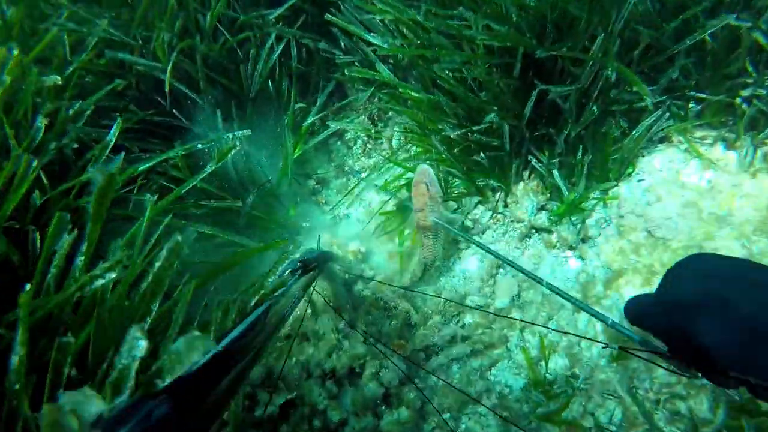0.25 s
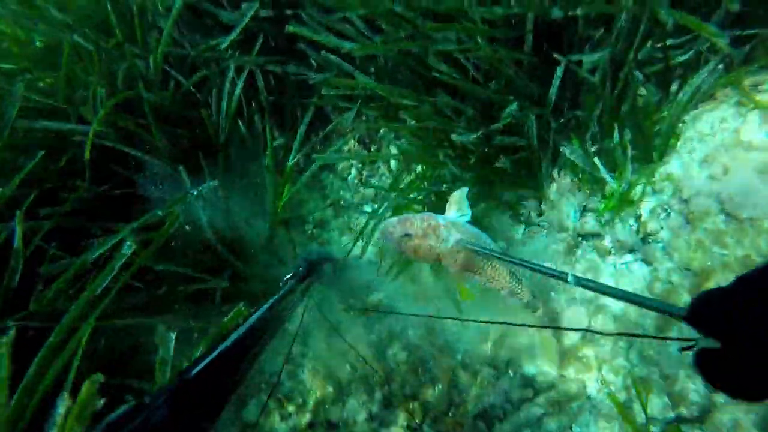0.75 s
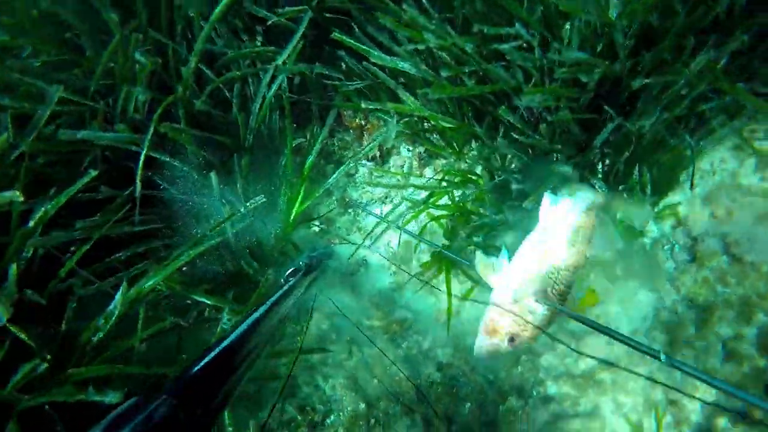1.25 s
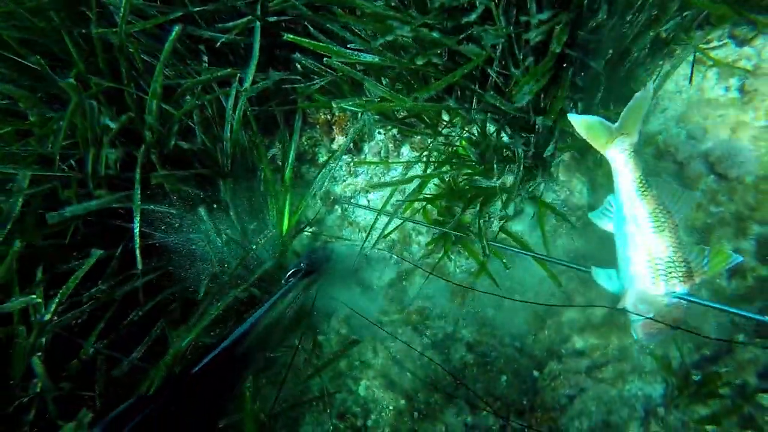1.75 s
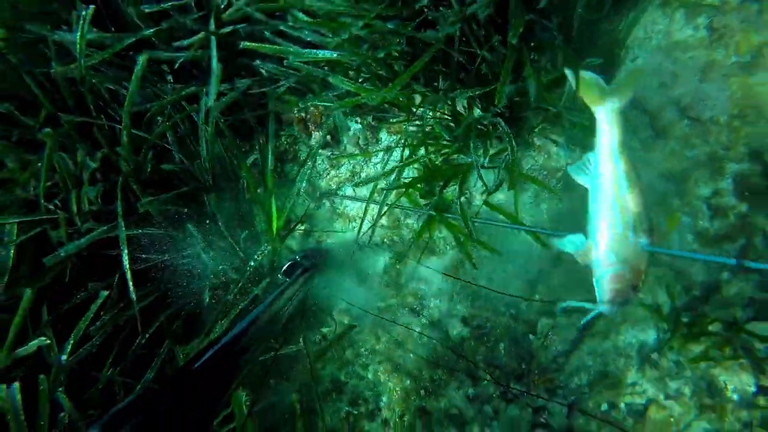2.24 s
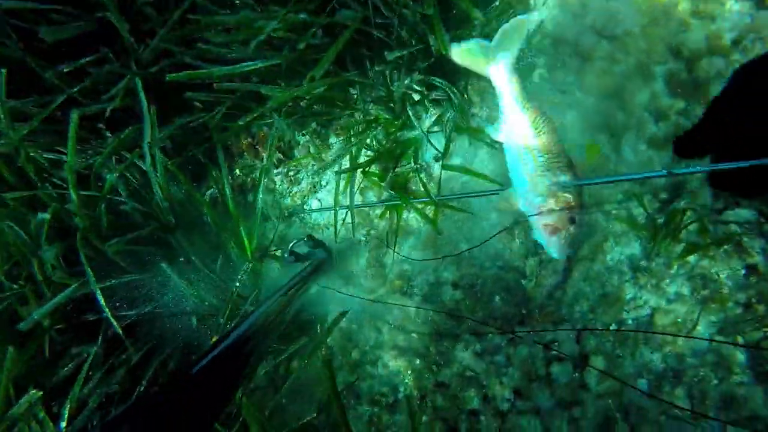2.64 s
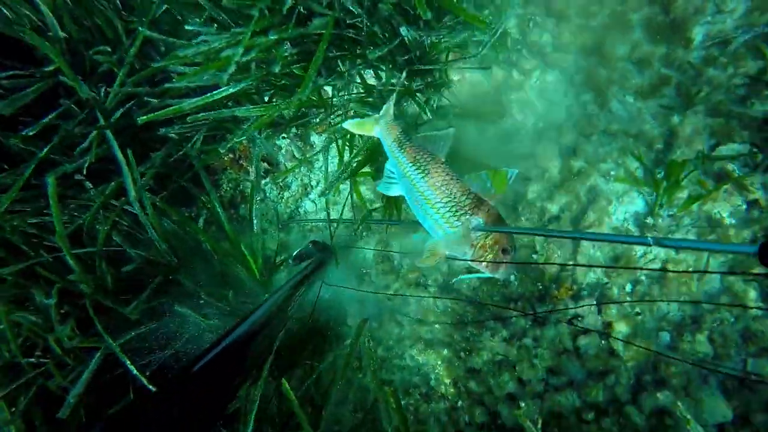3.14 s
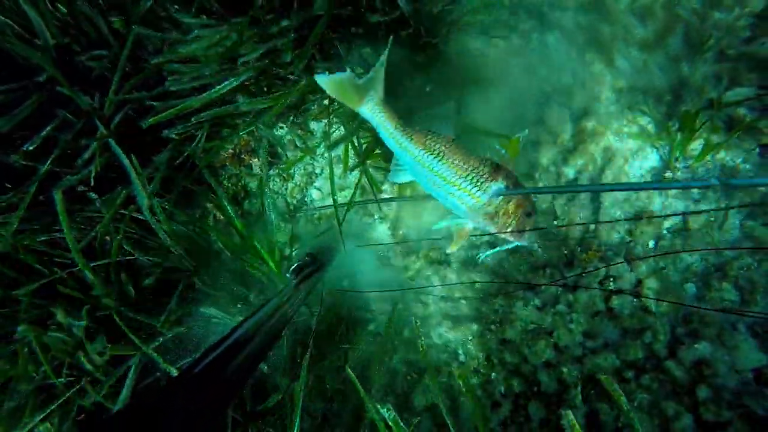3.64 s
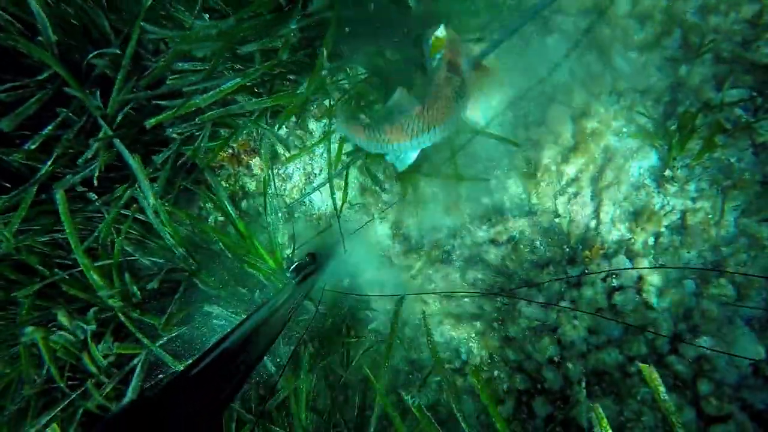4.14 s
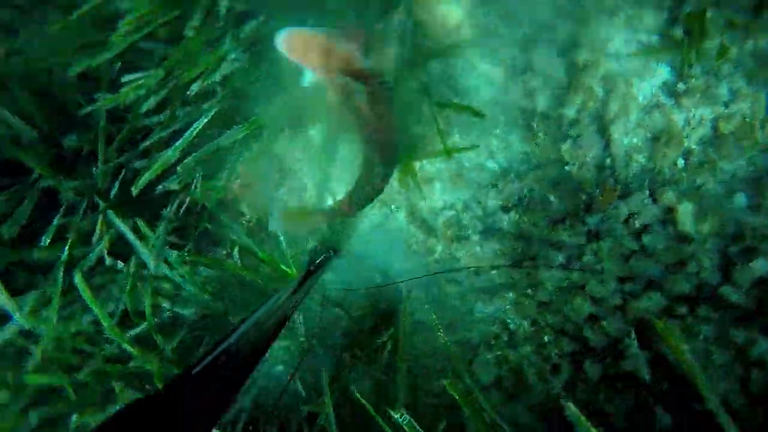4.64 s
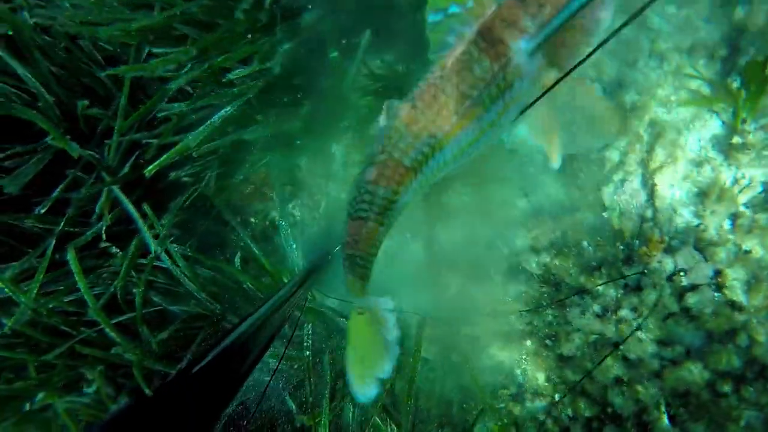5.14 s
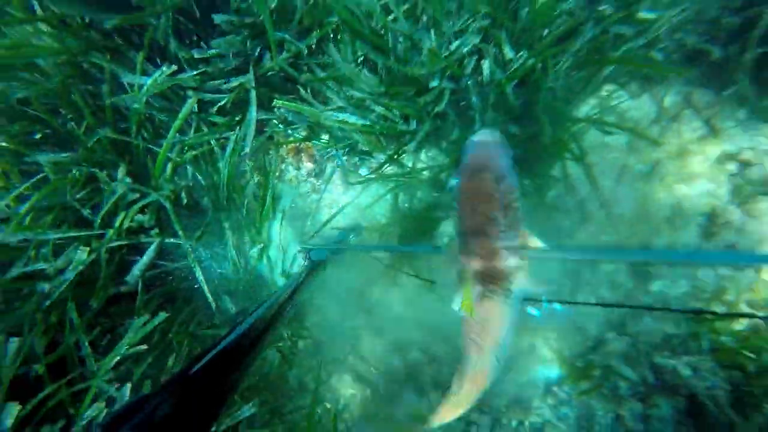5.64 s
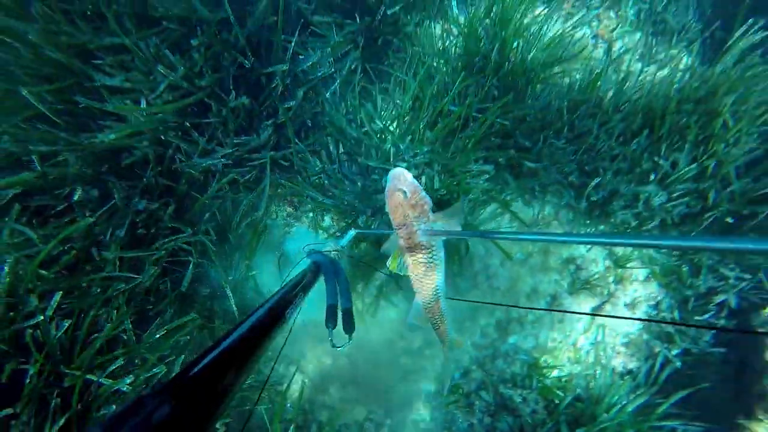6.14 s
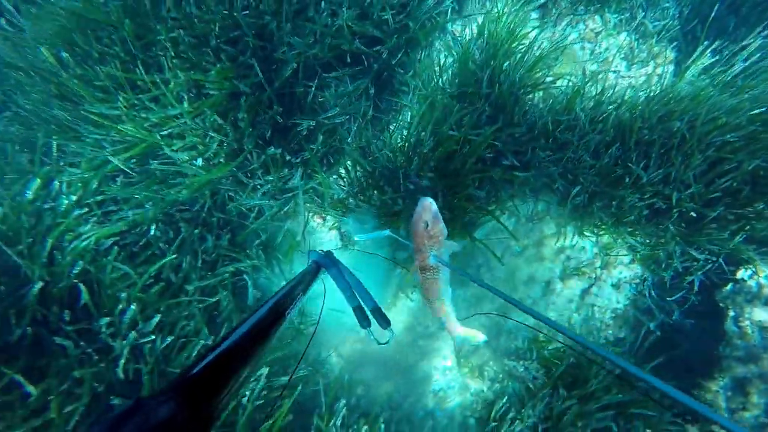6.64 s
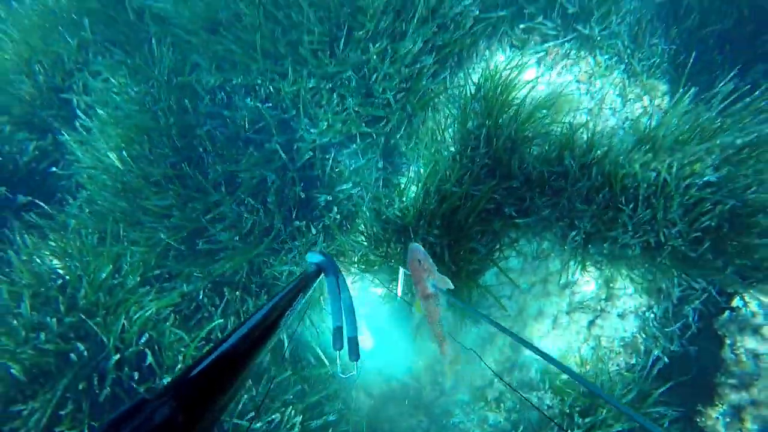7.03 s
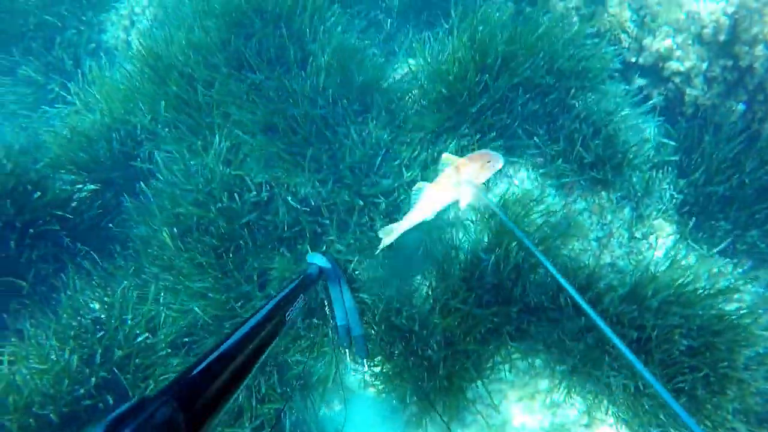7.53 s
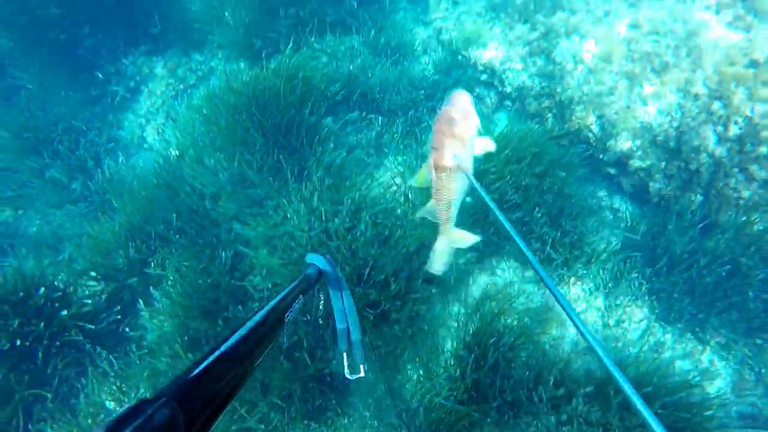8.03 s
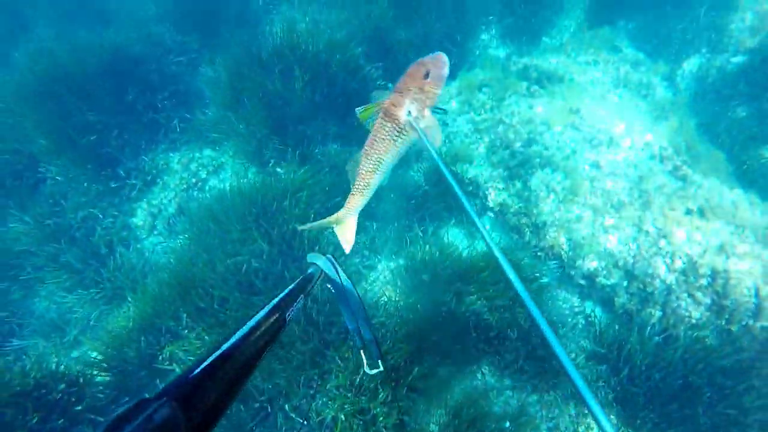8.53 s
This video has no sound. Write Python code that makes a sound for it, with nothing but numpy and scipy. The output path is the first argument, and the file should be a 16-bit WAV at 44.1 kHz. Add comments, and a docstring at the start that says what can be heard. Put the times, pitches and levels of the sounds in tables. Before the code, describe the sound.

A close, muffled underwater scene, picked up inside a housing mounted on a speargun. From 0 to 0.8 s the line rubs hard in grainy stick-slip bursts, with hollow ringing knocks and low barrel boom over deep uneven rumble. It eases around 1 to 1.8 s, then jerks and rattles strongly at 1.9 to 2.5 s and 2.7 to 2.8 s. Duller, low resonant bumps cluster at 3.2 to 3.4 s. After a softer stretch, the hardest clatter strikes at 4.6 to 4.8 s, slightly overloaded, and another burst at 5.4 to 5.6 s. Then it is much quieter: shrimp snaps, distant crackle, faint hiss and weak rubs. Thin, very high, rapidly chopped buzz leaks in at 1.4 to 2.4 and 6.4 to 7.4 s. The taut line hums low, rising then slipping back at 7.2 to 7.8 s amid small knocks, and again, dipping and recovering, from 8.3 s to the end near 8.8 s.

```python
"""Under water, inside a camera housing riding on a speargun, while a speared fish is hauled in.
From the start the line rubs the gun in stick-slip grains, the barrel booms over a deep uneven rumble, and
shrimp snap near and far through the housing wall; blows ring the gun and tick, mostly in the first 5.6 s.
At 1.4 s and again at 6.4 s the camera's circuits leak a thin, frame-chopped buzz for about a second.
From 7.2 s and from 8.3 s the taut line hums low, as gliding sines, strummed by the water."""
import sys
import numpy as np
from scipy import signal
from scipy.io import wavfile
from scipy.ndimage import uniform_filter1d

SR = 44100
rng = np.random.default_rng(int(sys.argv[2]) if len(sys.argv) > 2 else 0)


def unload_audio(sound):
    """Save the sound as a 16-bit wav file, at the path given as the first command line argument."""
    columns = np.transpose(np.atleast_2d(sound))
    # keep every value between -1 and 1, then stretch to whole-number steps
    steps = np.round(np.clip(columns, -1, 1) * 32767)
    wavfile.write(sys.argv[1], SR, steps.astype(np.int16))


N = 387198

# tugs that drag the line over the gun: start t/s, hold/s, low modes level/dB,
# mid modes level/dB re low, high modes level/dB re low, barrel boom level/dB re low
TUGS = [(0.0, 0.095, -23.5, -9.5, -14, -2.5), (0.111, 0.061, -16, -9, -18.5, 1),
        (0.227, 0.11, -21.5, -8.5, -17.5, 0.5), (0.349, 0.26, -18, -12, -21, -3.5),
        (0.626, 0.17, -20, -11, -21, -1), (1.012, 0.057, -34, -11.5, -25, 4),
        (1.239, .15, -28, -15, -28, 3), (1.48, 0.094, -34, -13, -20, -4),
        (1.632, 0.097, -27, -10.5, -22, 2.5), (1.8, 0.092, -36.5, -9, -24, 8),
        (1.891, 0.079, -28, -5, -13.5, 2), (1.937, 0.051, -21.5, -9.5, -13, -1),
        (2.084, 0.036, -14.5, -6, -22.5, -5.5), (2.15, 0.11, -22, -10, -26, 0.5),
        (2.415, 0.055, -22.5, -11, -19, 6), (2.676, .04, -43, -1.5, -12, -4),
        (2.745, 0.05, -17.5, -13, -24, 0.5), (2.819, 0.033, -24, -11.5, -23, -8),
        (2.924, 0.015, -34.5, -10.5, -25, 3.5), (3.035, 0.15, -31, -12, -20.5, 7),
        (3.199, 0.011, -17, -24, -41, 0), (3.246, 0.024, -13.5, -27, -43, -0.5),
        (3.33, 0.02, -16, -19, -43, 4), (3.398, 0.03, -15.5, -14, -26, -2),
        (3.572, 0.18, -37.5, -14, -24, 1), (3.691, 0.12, -31, -10.5, -25, -1.5),
        (3.923, 0.025, -34.5, -11.5, -14, 5.5), (4.03, 0.015, -30, -20, -27, 5),
        (4.203, .06, -42.5, -6, -18, -4), (4.351, 0.11, -30.5, -10, -19.5, 2),
        (4.47, 0.22, -29, -16, -23, 8), (4.72, 0.022, -11, -10.5, -17.5, 2),
        (4.789, 0.077, -36, -6, -17.5, 9), (4.964, 0.17, -29.5, -12.5, -23, 1.5),
        (5.23, 0.29, -33.5, -13.5, -18, 1), (5.422, 0.073, -23.5, -11, -20, 3),
        (5.485, 0.052, -18.5, -9.5, -33, 3.5), (5.57, 0.056, -36.5, -15, -17, -10),
        (5.687, 0.13, -42.5, -16, -26, 15), (6.217, .15, -47, -16, -6, 8.5),
        (6.582, .11, -36.5, -13.5, -17, 2), (6.751, 0.11, -37.5, -17.5, -28, -4),
        (6.99, 0.28, -39, -14, -25, 6), (7.472, 0.16, -39, -25, -31, 17.5),
        (7.616, 0.089, -31.5, -10.5, -19, -7), (7.759, 0.29, -36.5, -8, -17, 10),
        (8.078, 0.067, -42.5, -16, -20, 13.5), (8.282, 0.034, -36.5, -15, -27, 6),
        (8.402, 0.33, -42, -10, -15, 14)]
# distant shrimp crackle, before the wall: t/s, level/dB
SEA = [(0.0, -60), (0.29, -54.5), (0.64, -63.5), (0.78, -69), (1.22, -67), (2.08, -56.5), (2.3, -54.5),
       (2.47, -66.5), (4.04, -61.5), (4.25, -55), (4.6, -55.5), (4.81, -66), (5.28, -64), (5.48, -59),
       (5.79, -58), (6.43, -56.5), (7.78, -54), (8.78, -54.5)]
# ringing modes of gun and housing: f/Hz, width/Hz, relative level/dB
LOW_MODES = [(237, 88, -11.5), (327, 35, 4), (418.5, 55.4, 1.5), (498.5, 115, -2.5), (572.9, 45.7, 4.5),
             (794, 100, -15.5)]
MID_MODES = [(1126, 295, 9.5), (1381, 71.5, 16), (1595, 292, 5), (2300, 180, -28)]   # widths as rubbed
HIGH_MODES = [(3060, 64, 6.5), (3660, 240, 3), (4180, 187, 10.5), (4940, 110, -1), (5450, 170, -1),
              (6800, 2000, -85)]


def amp(db):
    """dB to gain."""
    return 10 ** (np.asarray(db) / 20)


def rms_one(x):
    """Scale to rms 1."""
    return x / np.sqrt(np.mean(x ** 2) + 1e-20)


def in_time(rows):
    """Columns of a curve, interpolated to every sample."""
    s, *columns = np.transpose(rows)
    return [np.interp(np.arange(N) / SR, s, c) for c in columns]


def wander(per_s):
    """Random curve of straight pieces through normal draws, per_s draws a second."""
    knots = rng.standard_normal(int(N / SR * per_s) + 2)
    return np.interp(np.arange(N) / SR * per_s, np.arange(len(knots)), knots)


def resonate(x, hz, width_hz):
    """Two-pole resonance, gain about 1 on top."""
    r = np.exp(-np.pi * width_hz / SR)
    feed = (1 - r * r) / 2 * np.array([1, 0, -1])
    return signal.lfilter(feed, [1, -2 * r * np.cos(2 * np.pi * hz / SR), r * r], x + 1e-18)


def body(x, modes, wander_db=0):
    """Parallel modes of alternating sign, scaled so that white noise of rms 1 comes out near rms 1.
    A moving contact point feeds each mode more or less as time goes on."""
    click = np.arange(SR) == 0
    response = ring = 0
    for k, (hz, width_hz, db) in enumerate(modes):
        gain = (-1) ** k * amp(db)
        response = response + gain * resonate(click, hz, width_hz)
        fed = x * amp(wander_db * wander(9))
        ring = ring + gain * resonate(fed, hz, width_hz)
    return ring / np.sqrt(np.sum(response ** 2))


def steep(x, hz, kind):
    """Fourth-order high- or low-pass."""
    return signal.sosfilt(signal.butter(4, hz, kind, fs=SR, output="sos"), x)


def grains(per_s, spread_db):
    """Random clicks, a few much bigger than the rest; rms 1."""
    sizes = amp(spread_db * np.minimum(rng.exponential(1, N), 4)) * rng.choice([-1, 1], N)
    return rms_one(sizes * (rng.random(N) < per_s / SR))


def struck(times, peak_db, modes, contact_s):
    """Each blow is a short dying rattle that strikes every mode with a strength of its own."""
    t = np.arange(int(.06 * SR)) / SR
    rattle = rng.standard_normal((len(times), len(t))) * np.exp(-t / np.reshape(contact_s, (-1, 1)))
    strengths_db = 3 * rng.standard_normal((len(times), len(modes)))
    out = np.zeros(N + 2 * len(t))
    for s, db, shake, own in zip(times, peak_db, rattle, strengths_db):
        shake = np.pad(shake, (0, len(t)))   # room to ring on
        ring = sum(amp(level + g) * resonate(shake, hz, w) for (hz, w, level), g in zip(modes, own))
        at = round(s * SR)
        out[at:at + len(ring)] += amp(db) * ring / np.abs(ring).max()
    return out[:N]


def tugged(level_db, order):
    """Level in dB of one group of modes: each tug rises, holds and falls; powers add to the slack line's."""
    # one entry a group, low, mid, high modes, boom: rise/(dB/s), fall/(dB/s), level between tugs/dB
    rise_db_per_s = [310, 355, 402, 207]
    fall_db_per_s = [312, 410, 453, 256]
    slack_db = [-52.5, -62, -73, -43.5]
    t = np.arange(0, N + 40, 40) / SR   # every 40 samples is fine enough
    start, hold = np.transpose(TUGS)[:2, :, None]
    before_db = rise_db_per_s[order] * np.clip(start - t, 0, None)
    after_db = fall_db_per_s[order] * np.clip(t - start - hold, 0, None)
    power = np.sum(amp(level_db[:, None] - before_db - after_db) ** 2, axis=0)
    power = power + amp(slack_db[order]) ** 2
    return np.interp(np.arange(N) / SR, t, 10 * np.log10(power))


def line_rub():
    """Stick-slip grains of the line shake the gun's low, mid and high modes; added noise feeds the high ones."""
    db, mid_re, high_re = np.transpose(TUGS)[2:5]
    low_db = tugged(db, order=0)
    mid_db = tugged(db + mid_re, order=1)
    high_db = tugged(db + high_re, order=2)
    slips = grains(2500, spread_db=5.5)
    fine = 0.5 * slips + 0.3 * rng.standard_normal(N)
    low = body(amp(low_db) * slips, LOW_MODES, wander_db=2.5)
    low = steep(steep(low, 140, "high"), 1030, "low")
    mid = body(amp(mid_db) * slips, MID_MODES, wander_db=1.5)
    mid = steep(steep(mid, 836, "high"), 2510, "low")
    high = body(amp(high_db) * fine, HIGH_MODES)
    high = steep(steep(high, 2300, "high"), 6900, "low")
    return low + mid + high


def barrel():
    """Grains at each tug ring the barrel's boom modes; under them resonant noise makes a deep rumble."""
    # level of the deep 24-35 Hz rumble, uneven by chance, before it follows the boom: t/s, level/dB
    rumble_curve = [(0.0, -5), (0.14, -25), (0.37, -10.5), (1.25, -28), (1.37, -18), (1.46, -25),
                    (1.98, -23), (2.22, -13.5), (3.13, -27), (3.38, -12), (3.86, -33), (4.18, -17.5),
                    (4.28, -35), (4.79, -8.5), (4.86, -25.5), (5.82, -26), (5.84, -12.5), (5.92, -21.5),
                    (6.53, -26.5), (6.63, -21), (7.85, -23), (7.92, -18.5), (8.71, -32.5), (8.78, -18)]
    # modes of rumble and boom: f/Hz, width/Hz, relative level/dB
    rumble_modes = [(24.4, 8.9, 17.5), (35, 16, -17)]
    boom_modes = [(59.8, 11, 7), (113.6, 16.3, -2.5), (150.6, 15.3, -3.5)]
    rumble_follows = .3   # share of the boom's swing in dB that the rumble takes on
    db, boom_re = np.transpose(TUGS)[[2, 5]]
    boom_db = tugged(db + boom_re, order=3)
    swing_db = boom_db - uniform_filter1d(boom_db, size=SR // 2)   # against its half-second mean
    rumble_db = in_time(rumble_curve)[0] + rumble_follows * swing_db
    rumble = steep(body(amp(rumble_db) * rng.standard_normal(N), rumble_modes), 56.5, "low")
    boom = body(amp(boom_db) * grains(300, spread_db=3.0), boom_modes, wander_db=4.5)
    return rumble + steep(steep(boom, 67.6, "high"), 191, "low")


def shrimp():
    """Near snaps and the sharp ticks of knocks one by one, far snaps as crackle over hiss, coloured by the wall."""
    # nearest snaps and ticks of knocks, before the filters: t/s, peak level/dB, treble level/dB re peak
    near_ticks = [(0.016, -27, -30), (0.2688, -37, -24), (0.311, -25, -27), (0.351, -20, -17),
                  (0.597, -30, -39), (0.614, -11.5, -52), (0.665, -25, -38), (1.0475, -30, -41),
                  (1.6303, -26, -30), (1.828, -30, -13), (2.0763, -20.5, -35), (2.306, -31, -25),
                  (2.379, -26, -23), (2.4647, -29, -31), (2.5517, -32, -21), (2.594, -35.5, -41),
                  (2.803, -19, -27), (3.1876, -25.5, -34), (3.3454, -26, -21), (3.3846, -19.5, -36),
                  (3.4825, -31, -37), (3.551, -32, -41), (4.0164, -25.5, 3), (4.255, -25.5, -27),
                  (4.4135, -30.5, -23), (4.514, -27, -10), (4.6293, -17, -33), (4.6675, -18, -36),
                  (4.704, -11, -29), (4.763, 2, -32), (4.855, -32, -13), (4.861, -28.5, -30),
                  (5.005, -15, -30), (5.029, -23, -29), (5.0606, -23, -26), (5.1015, -20.5, -45),
                  (5.238, -31, -22), (5.3458, -20, -33), (5.4805, -13.5, -11), (5.5034, -31, -25),
                  (5.683, -25.5, -21), (5.9, -27, -22), (6.0916, -31, -31), (6.133, -27, -24),
                  (6.342, -23.5, -20), (6.3807, -17, -9), (6.4223, -26.5, -21), (6.5483, -25, -23),
                  (6.5832, -28, -23), (6.6486, -31, -18), (7.121, -23, -28), (7.276, -21.5, -39),
                  (7.32, -24.5, 10), (7.349, -13.5, -15), (7.695, -20, -25), (7.812, -22.5, -14),
                  (7.9165, -23.5, -23), (7.9925, -27.5, -16), (8.0496, -37, -23), (8.084, -20, -14),
                  (8.139, -26.5, -7), (8.188, -25.5, -20), (8.34, -32, -15), (8.4233, -30, -19),
                  (8.511, -14, -10), (8.542, -27, 7), (8.604, -26, -18), (8.642, -24, -25),
                  (8.6855, -36, -15), (8.7396, -30.5, -23.5)]
    # how the housing wall colours snaps and ticks: f/Hz, width/Hz, relative level/dB
    wall_modes = [(2627, 520, 3), (4133, 320, 7.5), (5430, 2560, -5)]
    wall_treble_modes = [(6560, 18000, 5), (10300, 2700, -9), (13000, 4200, -19)]
    s, db, treble_db = np.transpose(near_ticks)
    near = steep(struck(s, db, wall_modes, contact_s=0.0024), 5160, "low")
    near += struck(s, db + treble_db, wall_treble_modes, contact_s=.0005)

    sea = amp(in_time(SEA)[0])
    snaps = np.abs(grains(120, spread_db=4.5))
    tail = signal.lfilter([1], [1, -np.exp(-1 / (0.0032 * SR))], snaps)   # 3.2 ms decay
    smeared = rms_one(tail * rng.standard_normal(N))   # bottom echoes
    far = 0
    for modes, gain_db in ((wall_modes, 11.0), (wall_treble_modes, 5.5)):
        own = grains(150, spread_db=2.5)   # dull and bright snaps also come apart
        crackle = 0.42 * smeared + 0.19 * own + 0.2 * rng.standard_normal(N)
        far = far + amp(gain_db) * body(sea * crackle, modes)
    dulled = signal.lfilter([.48], [1, -.6], near + far)   # the wall loses the top
    return steep(dulled, 1700, "high")


def microphone_hiss():
    """Smooth treble hiss that rises and falls with the distant crackle."""
    hiss_db = -14.5   # noise before the high-pass, re the crackle curve
    return steep(amp(in_time(SEA)[0] + hiss_db) * rng.standard_normal(N), 5500, "high")


def knocks():
    """Harder jerks of line and shaft ring the modes the rub does, the mid ones broader and quicker to die."""
    # blows on the gun, before the filters: t/s, mid modes peak level/dB,
    # low modes level/dB re that peak, nominal decay time of the rattle/s
    blows = [(0.0204, -10.5, -1, 0.0028), (0.2297, -24, 19.5, 0.0075), (0.396, -26, -13, 0.0033),
             (0.472, -16, 15.5, 0.0034), (0.5644, -6.5, -22, 0.0017), (0.6095, -10.5, 15.5, 0.0074),
             (0.6652, -14.5, 10.5, 0.011), (0.863, -27, -7, .003), (0.959, -30, 17, 0.0036),
             (0.9771, -22.5, 8.5, .004), (1.049, -23, 12, .003), (1.1146, -30.5, 8, 0.0041),
             (1.2223, -25, 17.5, 0.0034), (1.2829, -29.5, 23, 0.0022), (1.363, -14.5, -19, 0.002),
             (1.6012, -24.5, 8, .003), (1.7114, -18, 6, 0.0044), (1.976, -5, 0.5, 0.0029),
             (2.055, -18, 13, 0.0057), (2.071, -8.5, 7.5, 0.0037), (2.2029, -6, 12.5, 0.0022),
             (2.383, -31.5, 21, 0.008), (2.4068, -15, 4, 0.01), (2.4624, -7, 14.5, 0.0085),
             (2.7346, -22, 18, 0.0038), (2.801, -3.5, -7, 0.00099), (3.1113, -26, 6, .0027),
             (3.1686, -20.5, -9, 0.0045), (3.2008, -25, 26, 0.012), (3.241, -19.5, 21, 0.0057),
             (3.3271, -23.5, 22, 0.0055), (3.3841, -23, 25, 0.0098), (3.5394, -25, 7.5, 0.0032),
             (3.917, -30, 13, 0.0088), (4.026, -11, 4.5, 0.003), (4.3752, -31.5, 25, 0.011),
             (4.4273, -31, 12, 0.0048), (4.465, -12, 3.5, 0.0039), (4.6319, -2, 7, .0045),
             (4.6687, -9.5, -3, 0.0044), (4.7055, -4, 5.5, 0.0058), (4.7628, -2, 10, 0.0013),
             (5.005, -16.5, -7, .0024), (5.0624, -13.5, 5.5, 0.00095), (5.244, -32, 14.5, 0.0063),
             (5.3438, -19.5, 12, 0.0033), (5.438, -22, 3, 0.0014), (5.4841, -10, -26, 0.0033),
             (5.505, -6.5, 1, 0.0033), (5.5344, -9.5, -10, 0.0022), (6.6104, -28, 22, 0.0018),
             (6.9566, -34, 11, 0.005), (7.4529, -21.5, 3.5, 0.0055), (7.4821, -33, 22, .008),
             (7.4976, -31.5, 16, .004), (7.536, -25, 18, .0065), (7.5594, -21, 2, .0032),
             (7.5751, -20, 12.5, 0.019), (7.5966, -22, 16.5, .0033), (7.7595, -27, 3, 0.0013),
             (8.2867, -32, 6, .004)]
    low_lag_s = 0.00198   # the low modes answer a little later
    high_db = -26.5   # high modes re the mid peak
    s, db, low_db, rattle_s = np.transpose(blows)
    low = struck(s + low_lag_s, db + low_db, LOW_MODES, contact_s=rattle_s)
    damped = [(hz, 1.53 * w, level) for hz, w, level in MID_MODES]
    mid = struck(s, db, damped, contact_s=0.98 * rattle_s)
    high = struck(s, db + high_db, HIGH_MODES, contact_s=1.1 * rattle_s)
    return steep(low, 630, "low") + steep(mid, 1890, "low") + steep(high, 1200, "high")


def circuit_buzz():
    """High hiss and thin whine, strong for half of every picture frame; in surges the hiss swells and runs on."""
    # bouts of buzz: start t/s, length/s, first level/dB, last level/dB, before beat and surges
    bouts = [(1.423, 1.0, -65, -53.5), (6.412, 1.04, -51, -55)]
    # surge centres: t/s after the start of a bout
    surges_s = [.1, .19, .36, .51, .65, .76, .92]
    # tint of the hiss: f/Hz, width/Hz, relative level/dB
    buzz_modes = [(12700, 480, 1), (14250, 620, 6), (14700, 440, -6.5), (9560, 600, -4)]
    frames_per_s, frame_start_s = 59.94, 6.811
    surge_s, surge_db, rise_s, fade_s = .025, 7, .1, .025
    whine_hz, width_hz = 8560, 50
    whine_drive_db = -77   # into the resonances, before the frame beat

    t = np.arange(N) / SR
    busy = ((t - frame_start_s) * frames_per_s) % 1 < .5
    on = level = 0
    for start, length, first_db, last_db in bouts:
        since = t - start
        edge = np.clip(np.minimum(since / rise_s, (length - since) / fade_s), 0, 1)
        surge = np.clip(sum(np.exp(-((since - s) / surge_s) ** 2 * 2) for s in surges_s), 0, 1)
        beat_db = np.where(busy, 2.1, -7.0) * (1 - surge) + surge_db * surge
        on = on + edge
        level = level + edge * amp(np.interp(since, [0, length], [first_db, last_db]) + beat_db)
    hiss = body(level * grains(6000, spread_db=4.0), buzz_modes)
    tone = np.sin(2 * np.pi * whine_hz * t) / 8 + rng.standard_normal(N)
    whine = body(on * amp(whine_drive_db) * tone, [(whine_hz, width_hz, 0)])
    whine = resonate(whine, whine_hz, width_hz) * amp(np.where(busy, 3.0, -6.0))
    return steep(hiss, 10700, "high") + whine


def strum():
    """The taut line, strummed by the water on the way up, hums at a low gliding pitch with three overtones."""
    # one curve a bout: t/s, f/Hz, level/dB
    strum_bouts = [
        [(7.24, 77.4, -25.5), (7.364, 80.4, -29.5), (7.448, 110.9, -40), (7.578, 120.3, -17.5),
         (7.654, 105.4, -48), (7.76, 105, -33)],
        [(8.3, 86.7, -62), (8.342, 83.8, -30), (8.402, 80.1, -27), (8.446, 72, -21.5), (8.664, 78.5, -26.5),
         (8.78, 79.5, -26)],
    ]
    # partials: multiple of the pitch, relative level/dB
    partials = [(1, -4), (2, -12), (3, -19), (4, -23)]
    edge_s = .04
    t, out = np.arange(N) / SR, 0
    for rows in strum_bouts:
        hz, db = in_time(rows)
        turn = 2 * np.pi * np.cumsum(hz) / SR
        start, end = rows[0][0], rows[-1][0] + edge_s
        on = np.clip(np.minimum(t - start, end - t) / edge_s, 0, 1)
        hum = sum(amp(level) * np.sin(k * turn) for k, level in partials)
        out = out + on * amp(db) * np.sqrt(2) * hum
    return out


def scene():
    """Everything reaches one microphone inside the housing."""
    gun = line_rub() + barrel() + knocks() + strum()
    return (gun + shrimp() + microphone_hiss() + circuit_buzz())[None]


def record(dry):
    """The loudest blows overload softly; the top is cut steeply."""
    stop_hz = 15950   # 70 dB down from here up
    clipped = dry / (1 + np.abs(dry) ** 6) ** (1 / 6)
    return signal.sosfilt(signal.cheby2(12, 70, stop_hz, fs=SR, output="sos"), clipped)


dry = scene()
out = record(dry)
unload_audio(out)
```